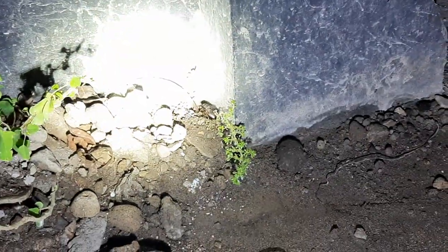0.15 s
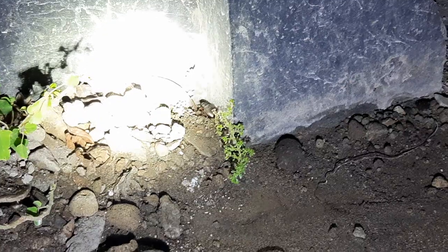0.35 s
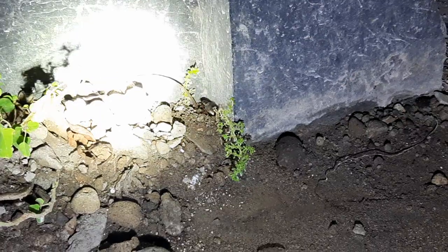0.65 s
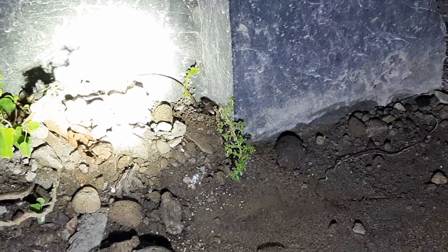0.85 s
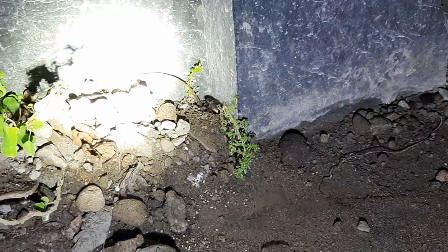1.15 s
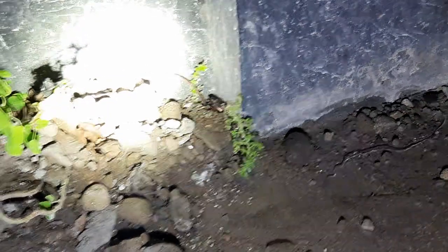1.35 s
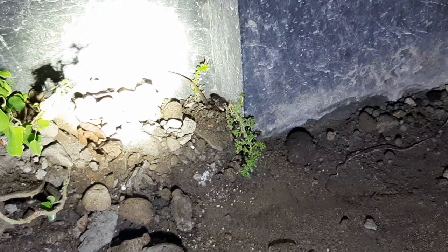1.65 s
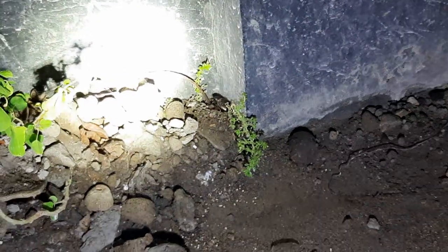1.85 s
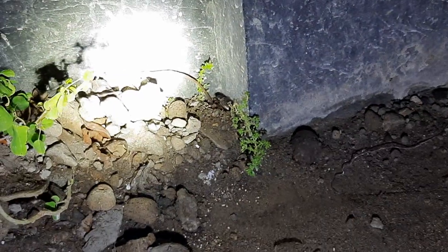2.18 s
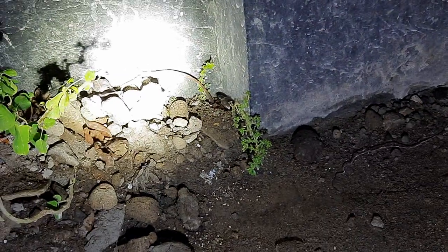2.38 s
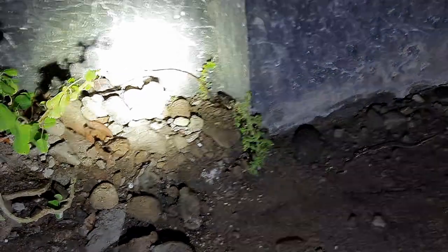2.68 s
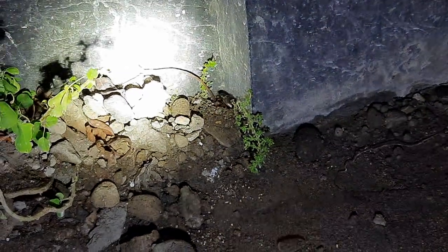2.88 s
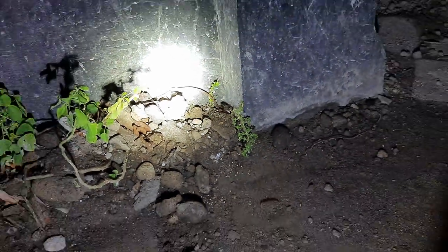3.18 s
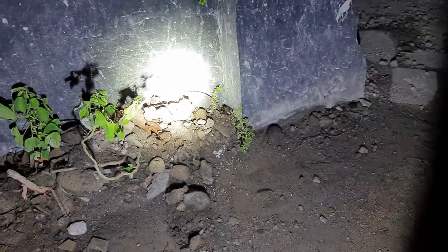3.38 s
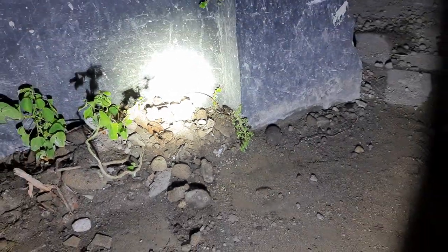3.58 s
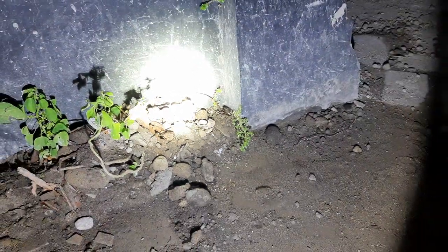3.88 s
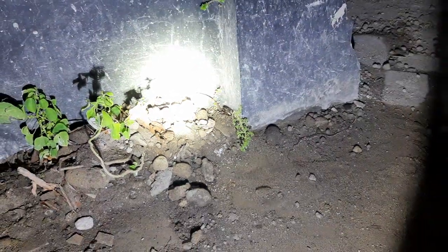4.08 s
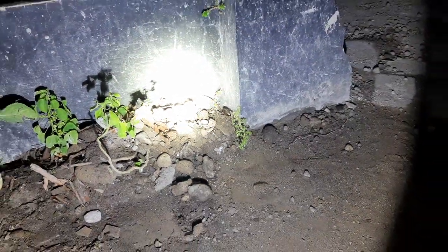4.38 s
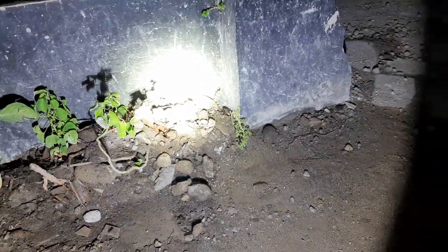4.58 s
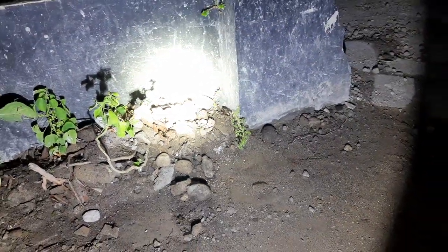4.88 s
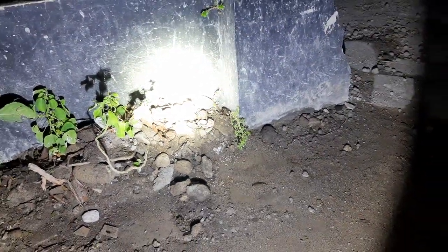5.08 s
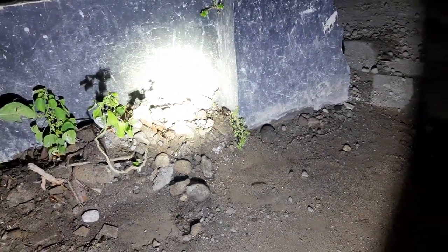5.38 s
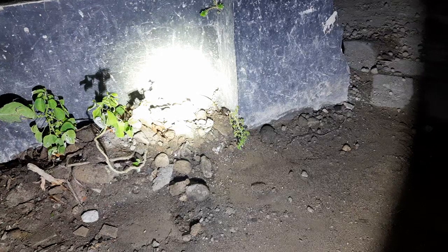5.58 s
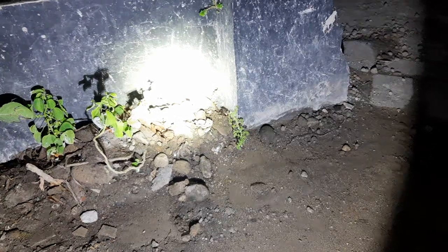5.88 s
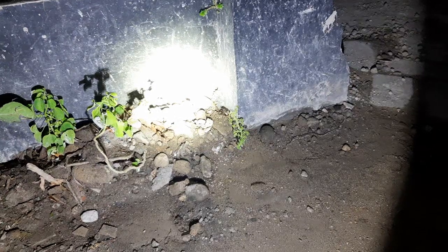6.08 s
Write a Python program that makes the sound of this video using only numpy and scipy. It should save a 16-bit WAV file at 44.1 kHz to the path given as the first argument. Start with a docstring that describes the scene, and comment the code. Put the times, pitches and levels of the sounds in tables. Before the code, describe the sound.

A single field cricket chirps close by throughout about six seconds, loud, pure and piercing near 5.8 kHz, stronger on the right. Each chirp is normally four pulses of roughly 15 ms, about 27 ms apart, the first a little softer, each gliding slightly down with a faint octave and thin hiss. Chirps come every 0.25 s, with somewhat wider gaps near 0.4 and 1.3 s; they are slightly quieter before 1.2 s, then steady. One around 5.2 s has only three pulses. Stones and walls add a short bright echo. Far below lies a faint deep rumble and humming town drone. A distant vehicle swells, its low exhaust drone peaking near 1.6 s, tyre roar around 2 to 2.5 s, fading by 4 s. Soft dull bumps with faint rustles occur near 4.5 and 5.5 s. Open night air, handheld stereo microphone.

```python
"""Night cricket by a stone wall

A field cricket chirps among stones, most often four wing strokes to a chirp: gliding tones with a weak
octave and a hissy noise that rides along. Random taps echo it off the stones and walls. Behind it,
shaped noise makes a vehicle passing on a distant road, an uneven deep rumble and the low drone of the
town, with wavering tones for the hum. Two soft shuffles come close by, each a dull bump and a rustle."""
import sys
import numpy as np
from scipy import signal
from scipy.io import wavfile
from scipy.ndimage import uniform_filter1d

SR = 44100
rng = np.random.default_rng(int(sys.argv[2]) if len(sys.argv) > 2 else 0)


def to_wav(sig):
    """Store sig (one row per channel, or 1-D mono) as 16-bit WAV at the path in sys.argv[1].

    Samples outside -1..1 are clipped; the rate is SR.
    """
    pcm = np.clip(np.atleast_2d(sig), -1, 1) * 32767
    pcm = np.round(pcm).astype(np.int16)
    wavfile.write(sys.argv[1], SR, pcm.T)  # frames by channels


N = 275625
PAD = SR // 2  # samples of room for the chirp whose tail opens the scene; also the length of the echo


def gain_of(db):
    """Turns decibels into a gain."""
    return 10 ** (np.asarray(db) / 20)


def evened(x):
    """Scales a sound to rms 1."""
    return x / np.sqrt(np.mean(x ** 2) + 1e-20)


def eased(x, size):
    """Rounds the corners of a curve by averaging neighbours twice."""
    once = uniform_filter1d(x, size, axis=-1)
    return uniform_filter1d(once, size, axis=-1)


def read(points, hz):
    """Reads a frequency table on a log-frequency axis."""
    f, value = np.transpose(points)
    return np.interp(np.log(hz + 1), np.log(f + 1), value)


def along(rows, t):
    """Reads every column of a curve table at times t."""
    s, *columns = np.transpose(rows)
    return [np.interp(t, s, c) for c in columns]


def add(mix, at, sound):
    """Mixes a sound in at a sample index, cutting what runs past the end."""
    part = mix[..., at:at + sound.shape[-1]]
    part += sound[..., :part.shape[-1]]


# how alike noise is left and right: (frequency_hz, likeness from -1 to 1)
LIKENESS = [(40, 0.94), (150, 0.95), (300, 0.86), (550, 0.65), (900, 0.25), (1600, 0.33), (5000, 0.033),
            (15000, 0.09)]
# usual left-right balance of noise: (frequency_hz, left_minus_right_db)
NOISE_BALANCE = [(40, -2.2), (300, -1), (1000, 0), (2500, -2.5), (8000, -4), (14000, -2.5)]
# how far the left side of noise leads in phase: (frequency_hz, lead_radians)
LEFT_LEAD = [(40, 0), (690, .24), (1720, 3.4), (16000, 3.4)]


def noise(spectrum, length, patchy_db, size=1024, balance=NOISE_BALANCE):
    """Stereo noise of rms 1, from random short-time spectra with smoothed louder and softer patches."""
    hz = np.fft.rfftfreq(size, 1 / SR)
    frames = 4 * length // size + 5
    a, b, c, d, patches = rng.standard_normal((frames, len(hz), 5)).T
    patches = uniform_filter1d(patches, size=6, axis=0)
    patches = evened(uniform_filter1d(patches, size=16, axis=1))
    same = np.clip(read(LIKENESS, hz), -1, 1)[:, None]
    left = a + 1j * b
    right = same * left + np.sqrt(1 - same ** 2) * (c + 1j * d)
    z = np.array([left * np.exp(1j * read(LEFT_LEAD, hz))[:, None], right])
    balance_db = np.outer([.5, -.5], read(balance, hz))[:, :, None]
    z *= gain_of(read(spectrum, hz)[:, None] + balance_db + patchy_db * patches)
    sound = signal.istft(z, nperseg=size, noverlap=3 * size // 4)[1]
    return evened(sound[:, :length])


def fuzzy(hz, filter_width_hz):
    """A wavering tone of rms 1: slow complex noise carried up to its pitch."""
    r = np.exp(-np.pi * filter_width_hz / SR)
    waver = rng.standard_normal(N) + 1j * rng.standard_normal(N)
    for _ in range(2):
        waver = signal.lfilter([1 - r], [1, -r], waver)
    carrier = np.exp(2j * np.pi * hz * np.arange(N) / SR)
    return evened((waver * carrier).real)


# how a chirp builds up, one row a stroke:
# (basic_length_ms, share of the softness left 0-1, pitch_offset_hz)
BUILD_UP = [(11.9, 1, -25), (15.4, .35, 0), (16.0, .08, -9), (16.4, 0, -17)]
LATE_GAP_MS, LATE_LENGTH_MS = 29, 15.0  # a stroke after a gap longer than the first gets the second


def chirp(first, strokes, gap, last_gap, full_db, soft_db, hz):
    """Lists the wing strokes of one chirp: (end_s, basic_length_ms, level_db, pitch_hz near mid stroke)."""
    gaps = (0, gap, gap, last_gap)[:strokes]
    rows = []
    for since, wait, (length, share, offset) in zip(np.cumsum(gaps), gaps, BUILD_UP):
        if wait > LATE_GAP_MS:
            length = LATE_LENGTH_MS
        rows.append((first + since / 1000, length, full_db - share * soft_db, hz + offset))
    return rows


# how the cricket reaches each side as the hand-held microphones drift:
# (time_s, left_minus_right_db, left_early_tilt_db per 4.5 ms, right_early_tilt_db per 4.5 ms,
# left_treble_db, right_treble_db)
BEARING = [(0.17, -10.5, 2.5, -0.3, 2, 1.5), (0.85, -6, 3, -3, 0.5, 2.5), (1.23, -5.5, 5, -0.3, 0, -3),
           (1.84, -8.5, 1, 1.2, -2.5, -0.5), (2.32, -7.2, 0.7, 1.5, -1, -2), (2.53, -9, 3, 0.8, -2, -2.5),
           (3.01, -12.4, -1.5, -0.6, -4, 1.5), (3.3, -12.5, -3, 0.1, -3.5, -5.5),
           (3.75, -11.5, -1.5, -0.9, -3.5, -4.5), (3.99, -10, -0.2, 0.2, -1.5, -5),
           (4.49, -11.5, -0.7, -0.1, -3, -3), (5.0, -10.5, 0.5, 0.3, 0, -3.5), (5.46, -9.5, 5, 1, -1, -4.5),
           (5.8, -9.5, 7.3, 1.3, 1.5, -6.5), (6.19, -9.8, 3.5, 1.1, 0.5, -3.5)]
# a stroke glides down as the wing's file runs out, and each microphone port favours other pitches:
# (from_end_ms, pitch_hz for a stroke tuned to 5790 Hz, left_db, right_db, left_octave_db, right_octave_db)
GLIDE = [(-16, 5990, -8.5, -14, -45, -41), (-11, 5945, -3.3, -6.8, -38, -35),
         (-7, 5800, -.8, -.9, -37.5, -42), (-5, 5705, -.5, -.2, -37, -45), (-1.5, 5515, -1, -2.6, -41, -48),
         (0, 5400, -2.5, -13, -45, -50), (1, 5220, -8, -22, -57, -58), (2, 5100, -18, -19, -70, -70),
         (3, 5250, -19, -17, -75, -75), (5, 5350, -25, -21, -85, -85), (7, 5350, -50, -50, -90, -90)]
LEAD_MS = .399  # the left port hears the cricket first


def stroke(end, length, level_db, hz, luck):
    """One closing of the wings: a gliding tone, its weak octave, and the outline of a hissy noise."""
    wobble_start, tone_start, snap_luck, octave_luck, hiss_luck, length_luck = luck
    balance_db, *early_db, treble_left_db, treble_right_db = along(BEARING, end)
    length = length + 1.2 * (length_luck - .5)
    ms = np.arange(-20, 10, 1000 / SR) + np.array([[LEAD_MS], [0]])
    pitch, left_db, right_db, left8_db, right8_db = along(GLIDE, ms)
    age = np.maximum(ms + length + .6, 0)  # ms since the stroke began
    abrupt = np.clip(14.0 - length, 0, 1)  # a short stroke sets in faster
    onset = 1 - np.exp(-(age / (2.4 - 1.9 * abrupt)) ** 1.5)

    # the wing starts a little flat and wobbles as teeth catch unevenly
    pitch = pitch * hz / 5790 - 70 * np.exp(-age / 2.2)
    pitch += 18 * np.sin(2 * np.pi * (.45 * ms + wobble_start))
    pitch = eased(pitch, size=30)
    head_start = LEAD_MS / 1000 * pitch[0, 0] * np.array([[1], [0]])
    turns = np.cumsum(pitch, axis=1) / SR + head_start + tone_start

    tone_db = np.array([left_db[0] + balance_db, right_db[1]])
    tone_db -= np.array(early_db)[:, None] * np.clip(ms + 7, -9, 7) / 4.5
    tone_db += .4 * np.sin(2 * np.pi * (.3 * ms + snap_luck))  # a slight ripple
    tone = onset * eased(gain_of(tone_db), size=30) * np.sin(2 * np.pi * turns)

    bright = gain_of([[treble_left_db], [treble_right_db]])
    octave_db = np.array([left8_db[0], right8_db[1]]) + 5 * (octave_luck - .5)
    octave = bright * eased(onset * gain_of(octave_db), size=20) * np.sin(4 * np.pi * turns)

    # every stroke starts with a snap of random strength, a little harder in a short, abrupt one
    snap = (1.6 + .6 * abrupt) * 2 * snap_luck * np.exp(-age / 1.4) * (age > 0)
    hiss = onset * gain_of(.4 * right_db[1] - 5.0 * abrupt + 6.0 * (hiss_luck - .5))
    outline = bright * eased(hiss + snap, size=16)
    fades = signal.windows.tukey(ms.shape[1], .15)
    return gain_of(level_db) * np.array([tone, octave, outline]) * fades


# one row a chirp: (first_stroke_end_s, strokes, gap_ms, gap_before_fourth_ms, full_level_db,
# first_stroke_softer_by_db, pitch_hz before each stroke's own offset)
CHIRPS = [(-0.1467, 4, 25.65, 28.3, -3.0, 1.1, 5792), (0.1333, 4, 25.65, 28.3, -3.7, 1.0, 5794),
          (0.3811, 4, 26.5, 28.2, -4.0, 1.6, 5782), (0.695, 4, 26.0, 27.6, -5.4, 1.6, 5782),
          (0.9484, 4, 26.0, 27.9, -4.4, 2.7, 5787), (1.1946, 4, 25.8, 28.1, -2.5, 1.3, 5800),
          (1.5657, 4, 26.9, 28.8, -2.0, 1.3, 5788), (1.7957, 4, 26.35, 27.2, -1.9, 0.8, 5796),
          (2.0466, 4, 26.0, 28.1, -2.2, 1.7, 5792), (2.2771, 4, 26.0, 28.1, -2.3, 2.1, 5792),
          (2.4884, 4, 27.1, 27.9, -2.7, 2.3, 5788), (2.7292, 4, 26.45, 28.2, -2.6, 1.7, 5801),
          (2.9735, 4, 26.35, 27.6, -3.0, 1.8, 5793), (3.1947, 4, 26.8, 28.2, -2.6, 2.0, 5791),
          (3.4557, 4, 26.5, 27.8, -2.6, 2.1, 5800), (3.7055, 4, 26.3, 27.4, -2.6, 1.9, 5799),
          (3.948, 4, 26.45, 27.9, -2.0, 2.1, 5805), (4.2038, 4, 25.45, 27.2, -2.3, 2.6, 5810),
          (4.4509, 4, 26.1, 27.3, -2.1, 2.3, 5805), (4.7059, 4, 25.9, 27.6, -2.0, 2.8, 5803),
          (4.9326, 4, 27.45, 31.3, -2.8, 1.3, 5803), (5.1971, 3, 28.7, 0, -3.1, 2.3, 5781),
          (5.4169, 4, 26.9, 30.0, -2.5, 2.4, 5790), (5.658, 4, 27.55, 34.3, -2.6, 2.1, 5800),
          (5.9176, 4, 27.7, 30.3, -2.5, 3.2, 5794), (6.1463, 4, 27.4, 29.6, -1.5, 2.2, 5795)]
# colour of the hissy noise that rides along with each stroke: (frequency_hz, level_db per Hz)
STROKE_HISS = [(6000, -35.5), (6500, -0.5), (8200, -17.5), (8600, -42.5), (10000, -46.5), (10600, -11.5),
               (12500, -18.5), (14000, -17.5), (15700, -22), (16100, -49.5)]
# left-right balance of that noise: (frequency_hz, left_minus_right_db)
STROKE_HISS_BALANCE = [(6500, -9.5), (8500, -8.5), (10500, -0.5), (16000, 4)]


def cricket():
    """All strokes, as tone and treble; hissy noise rides the strokes' outlines."""
    mix = np.zeros((3, 2, N + PAD))
    strokes = [row for call in CHIRPS for row in chirp(*call)]
    for row, luck in zip(strokes, rng.random((len(strokes), 6))):
        start = PAD + round((row[0] - .02) * SR)  # a stroke is drawn from 20 ms before its end
        add(mix, start, stroke(*row, luck))
    tone, octave, outline = mix
    # the wing radiates little outside this band, in Hz
    wing = signal.cheby2(8, 30, (4400, 9000), "band", fs=SR, output="sos")
    tone = signal.sosfiltfilt(wing, tone)
    hiss = noise(STROKE_HISS, N + PAD, patchy_db=5.5, size=256, balance=STROKE_HISS_BALANCE)
    return tone, octave + gain_of(-38.5) * outline * hiss


# how long the slow tail takes to fall by 60 dB: (frequency_hz, fall_time_s)
TAIL_TIME = [(4000, 0.35), (6000, 0.57), (9000, 0.28), (11500, 0.19), (16000, .15)]
# colour of the echoes: (frequency_hz, level_db)
ECHO_COLOUR = [(4700, 5), (5200, 8), (5600, -2.5), (6000, -6.5), (7500, -8.5), (9000, -3), (11500, 4),
               (16000, -2)]


def yard(x):
    """Sparse taps of random sign: quick scatter off the stones, then a slower tail off the walls."""
    taps = np.zeros((2, PAD))
    # one tap at a random place in every 20 samples
    at = np.arange(60, PAD - 20, 20) + rng.integers(0, 20, (2, (PAD - 61) // 20))
    np.put_along_axis(taps, at, rng.choice([-1., 1.], at.shape), 1)
    hz, t, z = signal.stft(taps, SR, nperseg=128)
    fall = gain_of(-60 * t / read(TAIL_TIME, hz)[:, None])
    fall += 5.0 * gain_of(-60 * t / .08)  # the scatter falls 60 dB in 0.08 s
    fall *= gain_of(read(ECHO_COLOUR, hz))[:, None]
    tail = signal.istft(z * fall, SR, nperseg=128)[1]
    tail = tail / np.linalg.norm(tail[0])
    return signal.fftconvolve(x[None], tail, axes=1)[:, :len(x)]


# the passing vehicle over an uneven deep rumble:
# (time_s, low_rumble_db, exhaust_drone_db, tyre_roar_db, tyre_hiss_db)
PASSING = [(0.0, -49, -47, -48.5, -54.5), (0.7, -48.5, -46, -46.5, -51.5), (1.25, -46.5, -41.5, -45, -49),
           (1.56, -42.5, -36.5, -40.5, -48), (1.9, -45.5, -40, -39, -47.5), (2.5, -49.5, -45, -40, -50.5),
           (3.12, -52.5, -49, -46.5, -51), (4.2, -57, -50.5, -53, -56.5), (5.2, -49.5, -55, -59, -61),
           (6.25, -51.5, -53.5, -70.5, -68.5)]
# colour of the deep rumble: (frequency_hz, level_db per Hz)
LOW_RUMBLE = [(25, -57.5), (40, -27), (60, -15.5), (85, -4), (115, 1), (150, -12), (200, -23),
              (1000, -89.5)]
# colour of the exhaust drone: (frequency_hz, level_db per Hz)
EXHAUST = [(60, -60.5), (130, -19.5), (180, -1), (250, 0), (295, -1), (340, -1), (390, -4), (480, -6.5),
           (650, -16.5), (2000, -88.5)]
# colour of the tyre roar: (frequency_hz, level_db per Hz)
ROAR = [(200, -51.5), (450, -13), (620, -6.5), (800, -1), (930, -7.5), (1020, -2.5), (1200, -1.5),
        (1450, -17.5), (2000, -41), (9000, -88.5)]
# colour of the tyre hiss: (frequency_hz, level_db per Hz)
TYRE_HISS = [(500, -56.5), (1400, 1), (2100, -3), (3000, -12.5), (5000, -16.5), (8500, -21), (9500, -33.5),
             (16000, -40)]
PIPE_HZ, PIPE_FILTER_HZ, PIPE_DB = 338.5, 14, -10.5  # fuzzy exhaust note, dB relative to the drone


def traffic():
    """Exhaust drone swells first, tyre roar and hiss a little later, over an uneven deep rumble."""
    levels_db = along(PASSING, np.arange(N) / SR)
    out = np.zeros((2, N))
    for db, spectrum in zip(levels_db, (LOW_RUMBLE, EXHAUST, ROAR, TYRE_HISS)):
        out += gain_of(db) * noise(spectrum, N, patchy_db=2.0, size=2048)
    exhaust_db = levels_db[1]
    return out + gain_of(exhaust_db + PIPE_DB) * fuzzy(PIPE_HZ, PIPE_FILTER_HZ)


# colour of the town's drone: (frequency_hz, level_db per Hz)
TOWN = [(25, -49.5), (45, -14.5), (90, 0), (125, -0.5), (160, -13), (250, -4.5), (350, -17), (550, -18.5),
        (1200, -18), (2500, -32), (4000, -56.5), (7500, -52.5), (9500, -56.5), (14500, -54.5),
        (16000, -74.5)]
# the wavering hum: (pitch_hz, filter_width_hz, level_db)
HUM = [(122.5, 25, -61.5), (251.5, 20, -58.5)]


def town():
    """A steady drone of low-pitched noise and a hum of wavering tones."""
    out = gain_of(-50.5) * noise(TOWN, N, patchy_db=2.5, size=2048)
    for hz, width, db in HUM:
        out += gain_of(db) * fuzzy(hz, width)
    return out


# soft shuffles close by: (start_s, bump_length_s, bump_db, rustle_db)
SHUFFLES = [(4.51, .09, -47, -72), (5.47, .11, -43.5, -65)]
# colour of the bump: (frequency_hz, level_db per Hz)
BUMP = [(250, -40), (340, -6), (395, 0), (460, -9), (600, -40), (16000, -90)]
# colour of the rustle: (frequency_hz, level_db per Hz)
RUSTLE = [(100, -86), (5500, -43), (7000, 3), (8200, 3), (10000, -7), (12000, -9), (14500, -23),
          (16000, -46)]


def shuffles():
    """A dull bump of low noise, with a faint high rustle that lasts longer."""
    bump, rustle = np.zeros((2, 2, N))
    for s, length, bump_db, rustle_db in SHUFFLES:
        start = round(s * SR)
        add(bump, start, gain_of(bump_db) * np.hanning(round(length * SR)))
        add(rustle, start, gain_of(rustle_db) * signal.windows.tukey(round(2.4 * length * SR), .6))
    dull = bump * noise(BUMP, N, patchy_db=1.5)
    return dull + rustle * noise(RUSTLE, N, patchy_db=4.5, size=256)


def scene():
    """The cricket, its echoes, and the night behind it."""
    tone, treble = cricket()
    # the ports face away from the direct treble, so more of it arrives by echo
    echoes = gain_of([[-24], [-19]]) * yard(tone[1])
    echoes += gain_of([[-6], [-7]]) * yard(treble.mean(0))
    return (tone + treble + echoes)[:, PAD:] + traffic() + town() + shuffles()


def record(dry):
    """The recorder's band limit: a steep filter takes away what lies above its edge."""
    edge_hz = 16350
    low_pass = signal.firwin(511, edge_hz, window=("kaiser", 9), fs=SR)
    return signal.oaconvolve(dry, low_pass[None], "same")


dry = scene()
out = record(dry)
to_wav(out)
```